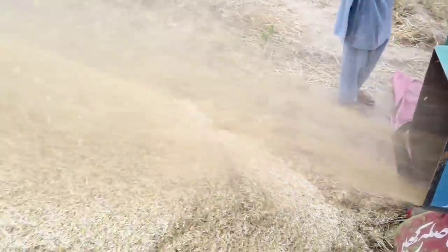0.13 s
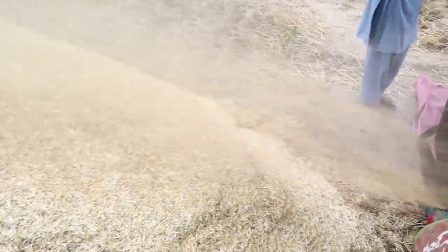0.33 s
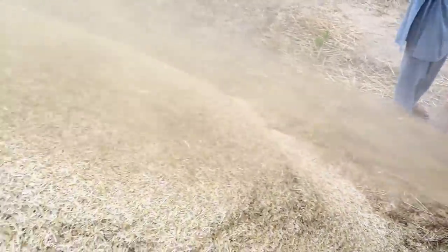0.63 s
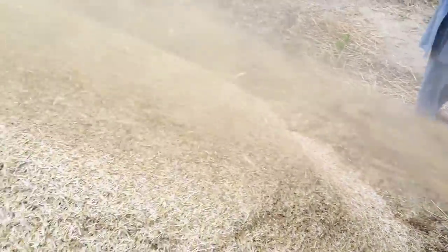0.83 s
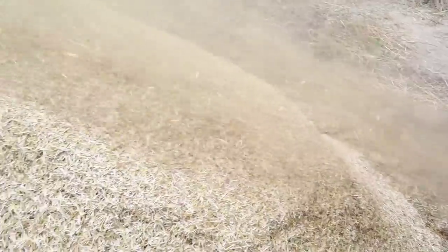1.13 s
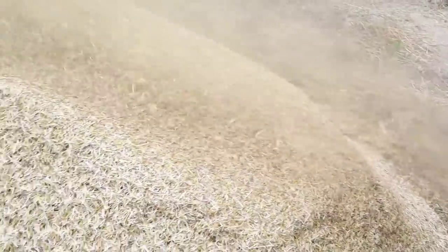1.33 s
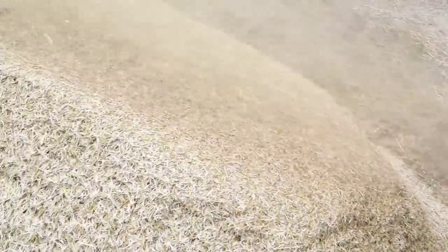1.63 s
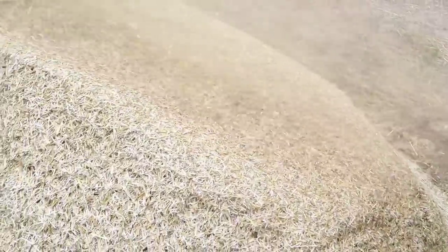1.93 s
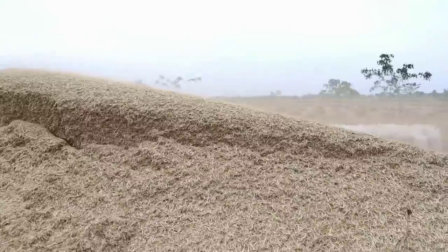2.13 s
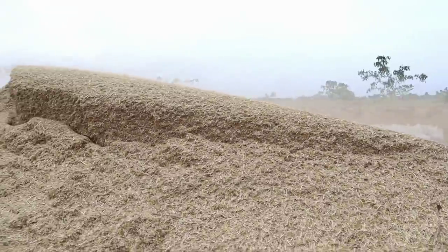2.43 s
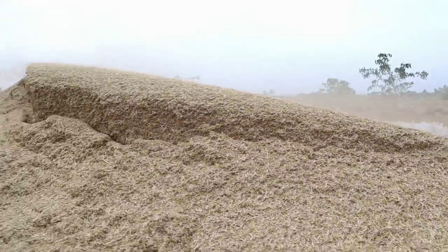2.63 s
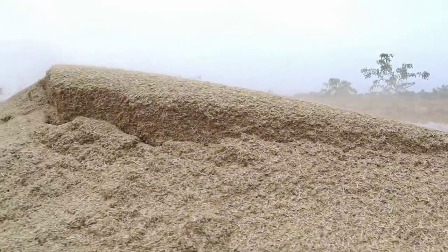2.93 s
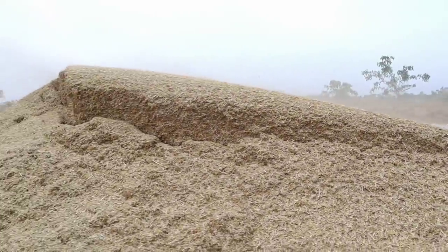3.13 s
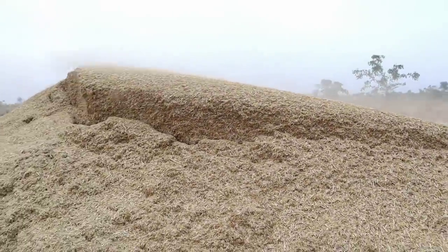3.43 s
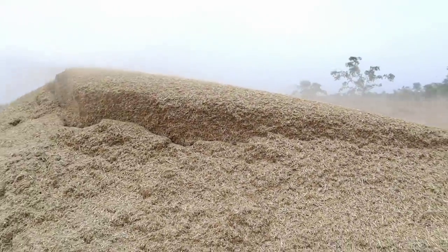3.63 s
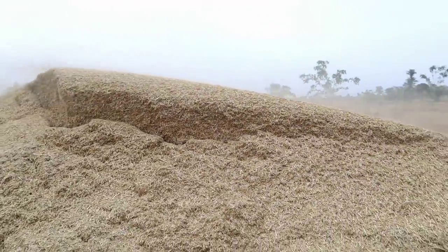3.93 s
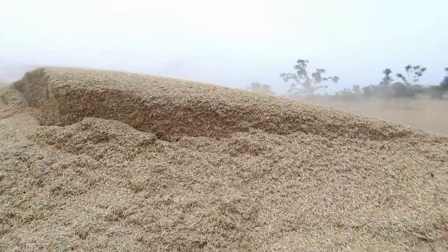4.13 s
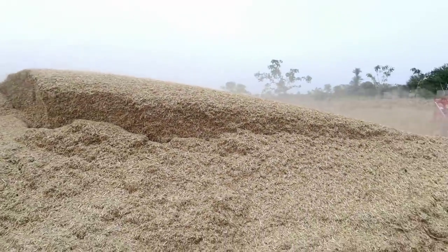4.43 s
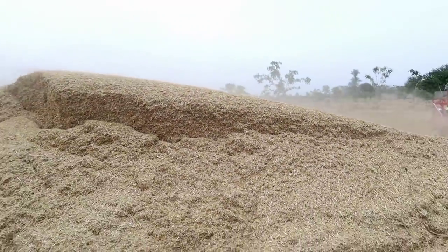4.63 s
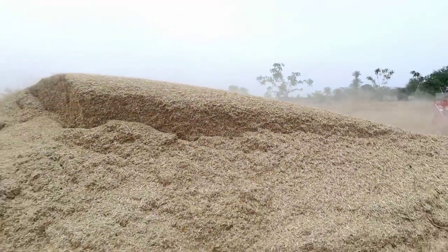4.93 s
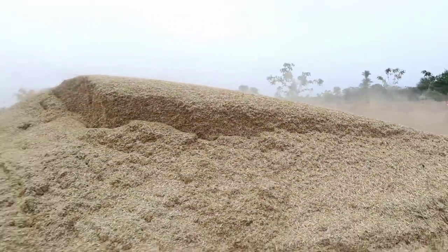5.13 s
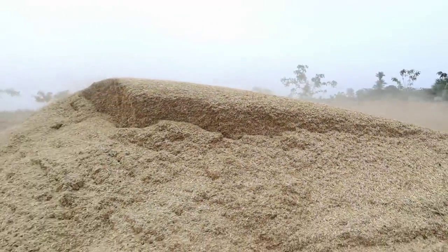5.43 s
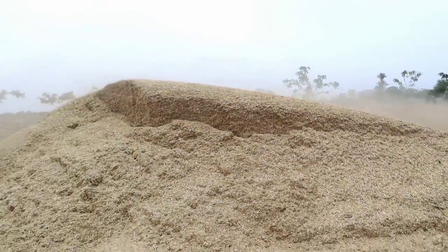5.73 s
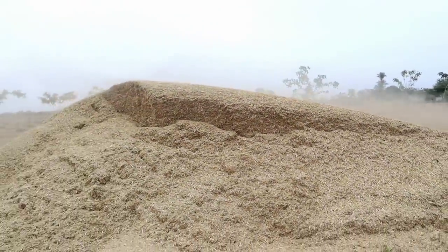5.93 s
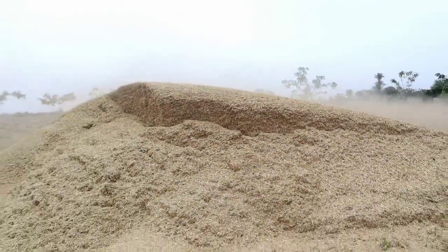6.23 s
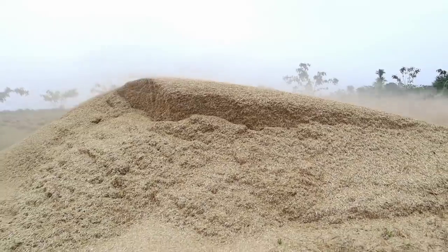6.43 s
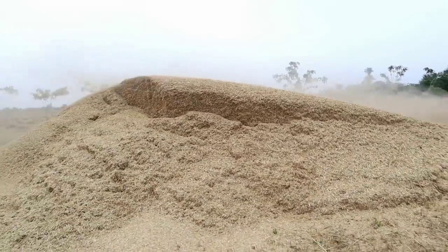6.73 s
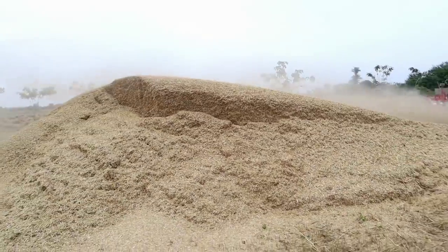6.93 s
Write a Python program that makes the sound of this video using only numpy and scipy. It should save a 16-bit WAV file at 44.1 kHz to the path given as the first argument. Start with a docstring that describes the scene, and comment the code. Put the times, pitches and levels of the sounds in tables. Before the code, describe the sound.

A diesel-driven thresher hums and roars steadily in a field, blowing hissing straw while stalks snap and patter on metal.

```python
"""A four-cylinder diesel drives a thresher in a field; its blower throws straw onto a heap.
The exhaust hums on its firing orders, the housing roars and throbs, and the straw jet hisses.
Stalks snap and patter on the sheet-metal casing and a loose part knocks, over a faint blower whine,
brief squeaks and booms. A handheld stereo microphone first stands beside the outlet, then the sound
crossfades to a place behind the heap, where the microphone slowly turns."""
import sys
import numpy as np
from scipy import signal
from scipy.fft import rfft, irfft, next_fast_len
from scipy.io import wavfile
from scipy.ndimage import uniform_filter1d, map_coordinates

SR = 44100
rng = np.random.default_rng(int(sys.argv[2]) if len(sys.argv) > 2 else 0)


def unload_audio(sound):
    """Save the sound as a 16-bit wav file, at the path given as the first command line argument."""
    columns = np.transpose(np.atleast_2d(sound))
    # keep every value between -1 and 1, then stretch to whole-number steps
    steps = np.round(np.clip(columns, -1, 1) * 32767)
    wavfile.write(sys.argv[1], SR, steps.astype(np.int16))


N = 311787
TIME = np.arange(N) / SR

# resonances of the loose part: pitch_hz, width_hz, gain_db
LOOSE_PART_MODES = [(1800, 350, -3.5), (2900, 500, -1.5), (3350, 300, -1), (3850, 300, 0), (4500, 700, -9)]


def amp(db):
    """Decibels to linear gain."""
    return 10 ** (np.asarray(db) / 20)


def unit(x):
    """Normalise to rms 1."""
    return x / np.sqrt(np.mean(x ** 2) + 1e-20)


def along(points, hz):
    """Read a curve of (freq_hz, value) points on a log frequency axis."""
    freqs, values = np.transpose(points)
    return np.interp(np.log(hz + 1), np.log(freqs + 1), values)


def curves(rows):
    """One automation curve for each column after the time."""
    times, *columns = np.transpose(rows)
    return [np.interp(TIME, times, column) for column in columns]


def wobble(rate):
    """Smooth random modulation, rate knots a second."""
    return map_coordinates(rng.standard_normal(int(N * rate / SR) + 4), [TIME * rate])


def filtered(x, response):
    """Filter x by a complex frequency response."""
    size = next_fast_len(N + SR // 4)
    return irfft(rfft(x, size) * response(np.fft.rfftfreq(size, 1 / SR)), size)[..., :N]


def patchy(depth_db):
    """Two white noises that share random patches of gain in time and frequency."""
    spectra = signal.stft(rng.standard_normal((2, N)), nperseg=512)[2]
    patches = uniform_filter1d(rng.standard_normal(spectra.shape[1:]), size=10, axis=0)
    patches = uniform_filter1d(patches, size=6, axis=1)
    return signal.istft(spectra * amp(depth_db * unit(patches)), nperseg=512)[1][:, :N]


def coloured(pair, eq):
    """A noise pair through an EQ curve, at rms 1."""
    return unit(filtered(pair, lambda hz: amp(along(eq, hz))))


def swell(start_s, length_s):
    """Half-sine envelope."""
    return np.sin(np.pi * np.clip((TIME - start_s) / length_s, 0, 1))


def scattered(count, softest_db, range_db):
    """Random hits: start_s, level_db."""
    when, strength = rng.random((count, 2)).T
    return np.c_[when * (N - 1) / SR, softest_db + range_db * strength]


def impacts(hits, modes, t60_s, boost_db, attack_s):
    """Each hit is a short noise burst that rings a set of resonances."""
    t = np.arange(SR // 10) / SR
    envelope = amp(boost_db - 60 * t / t60_s) * (1 - np.exp(-t / attack_s))
    force = np.zeros((2, N + len(t)))
    for start_s, db in hits:
        start = round(start_s * SR)
        force[:, start:start + len(t)] += amp(db) * envelope * np.sign(rng.standard_normal((2, len(t))))

    def body(hz):
        return sum((-1) ** k * amp(db) * 1j * hz * width / (pitch ** 2 - hz ** 2 + 1j * hz * width)
                   for k, (pitch, width, db) in enumerate(modes))
    return filtered(force[:, :N], body)


def perspective(near, far, turned):
    """Crossfade from beside the outlet (near) to behind the heap (far), then swing round (turned)."""
    fade_s, turn_s = (2.1, 2.324), (3.7, 4.35)
    away = np.interp(TIME, fade_s, [0, 1])
    swung = np.interp(TIME, turn_s, [0, 1])
    return (1 - away) * near + away * ((1 - swung) * far + swung * turned)


def left_channel(pair):
    """The left port is shaded, out of phase and partly unrelated to the right, which hears pair[0]."""
    # left level against right: freq_hz, gain_db
    shade = [(50, 0), (90, -.2), (170, -1.3), (300, -3.6), (450, -5.6), (650, -6.8), (900, -5.6),
             (1250, -6), (1800, -9), (2400, -7.5), (3300, -4.2), (4500, -6), (5500, -3), (8000, -1.3),
             (12000, -.2)]
    # left phase against right: freq_hz, phase_rad
    phase = [(150, 0), (450, -.2), (650, -.45), (900, -1.15), (1250, -1.9), (1700, -2.25), (2400, -2.15),
             (3300, -2.7), (5500, -2.75), (8000, -3.05), (12500, -3.4)]
    # likeness of the ports in each perspective: freq_hz, coherence (0-1)
    near_coherence = [(150, 1), (450, .98), (900, .9), (1700, .75), (3300, .73), (5500, .6), (8000, .76),
                      (11000, .66), (13000, .5)]
    far_coherence = [(150, 1), (450, .97), (900, .94), (2400, .83), (4500, .75), (5800, .98), (8300, .99),
                     (9500, .6), (11000, 0)]
    turned_coherence = [(150, 1), (450, .97), (900, .91), (3300, .82), (5500, .65), (8000, .84),
                        (11000, .93), (12500, .5)]

    def port(coherence):
        def response(hz):
            alike = np.clip(along(coherence, hz), 0, 1)
            shadow = amp(along(shade, hz)) * np.exp(1j * along(phase, hz))
            return shadow * [alike, np.sqrt(1 - alike ** 2)]
        return filtered(pair, response).sum(axis=0)
    return perspective(port(near_coherence), port(far_coherence), port(turned_coherence))


def blower_whine():
    """Faint wavering tones of the blower, heard only behind the heap."""
    # tones once the microphone has turned: pitch_hz, level_db
    partials = [(553, -54.5), (742, -51), (1070, -61)]
    tones = np.zeros(N)
    for hz, db in partials:
        gain = np.sqrt(2) * amp(db + 1.7 * wobble(4.3))
        tones += gain * np.sin(2 * np.pi * hz * TIME + .9 * wobble(4))
    return perspective(0, amp(-4.5) * tones, tones)


def squeaks():
    """Brief high squeaks that flutter in level and pitch."""
    # squeak cues: start_s, length_s, pitch_hz, level_db
    cues = [(1.045, .03, 3950, -42), (1.32, .08, 3950, -44), (5.61, .03, 3150, -42)]
    out = np.zeros(N)
    for start_s, length_s, hz, db in cues:
        envelope = amp(db + 4.6 * wobble(87.7)) * swell(start_s, length_s) ** .5
        out += envelope * np.sin(2 * np.pi * hz * TIME + 0.77 * wobble(200))
    return out


def casing_booms():
    """The casing booms briefly: narrow noise swells in one resonance at a time."""
    # boom cues: start_s, length_s, pitch_hz, level_db
    cues = [(4.9, 0.57, 565, -43.5), (5.499, 0.282, 731, -40.5)]
    width_hz = 28
    out = np.zeros(N)
    for start_s, length_s, pitch_hz, db in cues:
        ring = filtered(rng.standard_normal(N), lambda hz: np.exp(-((hz - pitch_hz) / width_hz) ** 2))
        out += amp(db) * swell(start_s, length_s) * unit(ring)
    return out


def loose_part_rattle():
    """The loose part chatters in many small random hits."""
    hits = scattered(150, softest_db=-44, range_db=8)
    return impacts(hits, LOOSE_PART_MODES, t60_s=.032, boost_db=12.5, attack_s=.001)


def loose_part_knocks():
    """Harder hits of the loose part, each with a short bright ring."""
    # knock cues: start_s, strength_db
    hits = [(0.269, -27.5), (0.39, -30), (1.11, -31.3), (1.627, -32.7), (1.988, -33.5), (2.145, -33),
            (2.945, -32.5), (3.102, -34), (3.424, -34), (3.9, -35), (4.155, -33), (4.166, -30.5),
            (4.18, -32), (4.253, -33.5), (4.317, -33), (4.442, -33), (4.755, -32), (4.829, -32),
            (4.85, -33), (5.048, -27.5), (5.06, -30), (5.16, -34), (5.208, -32.5), (5.358, -33.7),
            (5.423, -33.5), (5.505, -33), (5.618, -30), (5.849, -27), (5.955, -29.5), (6.009, -32),
            (6.049, -31.5), (6.154, -29.5), (6.193, -33), (6.259, -28), (6.367, -30.5), (6.4, -33),
            (6.445, -32), (6.514, -29.5), (6.62, -33.5), (6.662, -33), (6.768, -30.5), (6.861, -32),
            (6.952, -32), (7.0, -32), (7.02, -33)]
    return impacts(hits, LOOSE_PART_MODES, t60_s=.038, boost_db=14.2, attack_s=.001)


def casing_patter():
    """Grain and stalks patter on the casing, clearest once the microphone has swung round."""
    # sheet-metal resonances: pitch_hz, width_hz, gain_db
    modes = [(555, 54, -1.5), (740, 39, 1), (803, 44, -3.5), (1081, 54, 0), (1683, 140, 0.5),
             (1897, 220, -4), (2970, 320, -14), (3970, 280, -22)]
    # the hardest taps: start_s, strength_db
    hard_hits = [(4.2066, -41), (4.253, -37), (4.3198, -37), (4.4505, -33), (4.6541, -31), (4.7189, -28),
                 (4.7858, -33), (4.92, -34), (5.0332, -33), (5.3235, -36), (5.3704, -34), (5.4368, -36),
                 (5.5076, -37), (5.577, -35), (5.6902, -36), (6.0329, -32), (6.0798, -29), (6.2609, -38),
                 (6.3547, -35), (6.5852, -32), (6.678, -30), (6.7234, -34), (6.7922, -33), (6.9074, -34),
                 (6.9738, -28.5), (7.0232, -40)]
    light_hits = scattered(700, softest_db=-33, range_db=6)
    patter = impacts(light_hits, modes, t60_s=.02, boost_db=16, attack_s=.0007)
    clacks = impacts(hard_hits, modes, t60_s=.019, boost_db=23, attack_s=.0007)
    return patter * perspective(amp(-8.5), amp(-5.5), amp(-2.5)) + clacks


def stalk_snaps():
    """Stalks strike close by with a crisp snap."""
    # snap cues: start_s, strength_db
    hits = [(0.105, -30), (0.323, -35), (0.487, -25), (0.606, -28), (0.892, -26), (1.034, -20.5),
            (1.223, -28), (1.318, -28), (1.365, -21.5), (1.412, -24.5), (1.436, -32), (4.184, -27),
            (4.451, -29), (4.888, -33)]
    # stalk resonances: pitch_hz, width_hz, gain_db
    modes = [(4500, 2000, -8), (7000, 1500, -4), (9200, 1200, 0), (11500, 2000, -3)]
    return impacts(hits, modes, t60_s=.11, boost_db=0, attack_s=.0024)


def straw_hiss(level_db, shake):
    """The straw jet hisses unevenly and pulses lightly with the engine."""
    # hiss EQ in each perspective: freq_hz, gain_db
    near_eq = [(3000, -14), (5000, -.5), (7000, -1), (9500, 0), (11000, 0), (12500, -4), (14000, -11),
               (15400, -24)]
    far_eq = [(3000, -14), (4300, 2), (5500, 2.5), (6500, -2), (8000, -3), (11000, -4), (12500, -5),
              (14000, -9), (15400, -20)]
    turned_eq = [(3000, -16), (4700, 0), (7000, -3), (8000, 0), (9800, 0), (11000, -4), (12500, -8),
                 (14000, -14), (15400, -29)]
    chaff = patchy(depth_db=1.1) * np.sqrt(shake)
    chaff *= amp(wobble(5) + 1.1 * wobble(14) + 1.5 * wobble(300))  # clumps and single grains
    return amp(level_db) * perspective(*[coloured(chaff, eq) for eq in (near_eq, far_eq, turned_eq)])


def housing_roar(level_db, shake):
    """Housing and blower roar: broad noise that throbs with the engine."""
    # roar EQ in each perspective: freq_hz, gain_db
    near_eq = [(45, -8), (65, -4), (85, -8), (110, -6.5), (165, -1.5), (205, 4), (270, -2), (350, 0),
               (430, -3), (560, -3.5), (720, -2), (1100, -6.5), (1500, -10.5), (2500, -13.5), (3900, -17.5),
               (4600, -20), (6500, -53)]
    far_eq = [(45, -13), (70, -5), (120, -5.5), (155, -5), (195, 0), (240, -6), (330, -5), (400, -1),
              (480, -1), (680, -3), (800, -2.5), (950, -6.5), (1100, -3), (1500, -10.5), (2200, -9),
              (2700, -16), (4000, -16.5), (6500, -42)]
    turned_eq = [(45, -3.5), (70, -7), (150, -2), (200, -2), (300, -6.5), (400, -8.5), (560, -1.5),
                 (670, 0), (740, -3), (810, 0), (870, -7), (1100, -6.5), (1210, -7.5), (1700, -8.5),
                 (2300, -11.5), (3200, -17), (3900, -14), (6500, -48)]
    air = patchy(depth_db=0.8) * shake
    return amp(level_db) * perspective(*[coloured(air, eq) for eq in (near_eq, far_eq, turned_eq)])


def throb(angle, depth_db):
    """Each firing shakes the housing; one cylinder in four shakes it more."""
    return amp(depth_db * (np.cos(angle) + 0.31 * np.cos(2 * angle) + 0.17 * np.cos(angle / 4)))


def exhaust(firing_hz, automated, strong, weak, sway_db, flutter_db, slip_rad, lope_db):
    """Sines at multiples (orders) of the firing rate, loping once in four firings: hum, firing angle."""
    angle = 2 * np.pi * np.cumsum(firing_hz) / SR
    swaying = [(order, db + sway_db * wobble(2.7)) for order, db in strong]
    hum = np.zeros(N)
    for order, db in automated + swaying:
        # the pipe spreads each pulse: higher orders slip in phase, and all drift a little
        hum += amp(db) * np.cos(order * angle + slip_rad * (order - 1) ** 2 + .2 * wobble(.7))
    for order, db in weak:  # fractional orders come from unequal cylinders
        hum += amp(db + flutter_db * wobble(3.7)) * np.sin(order * angle + 2 * np.pi * rng.random())
    return np.sqrt(2) * hum * amp(lope_db * np.cos(angle / 4)), angle


def diesel_near():
    """Beside the outlet the diesel lopes and creeps up in speed."""
    # engine automation: time_s, firing_hz, order1_db, order2_db, order4_db
    automation = [(0.0, 41.9, -40, -34, -33.5), (0.3, 41.87, -40, -40, -35.5), (0.55, 41.78, -45, -41, -38),
                  (0.68, 42.05, -45, -42, -38), (0.8, 42.25, -42, -39, -34.5),
                  (1.1, 42.44, -44, -34.5, -35), (1.35, 42.55, -43, -33, -34), (1.55, 42.5, -41, -33, -40),
                  (1.75, 42.68, -39, -32.5, -38.5), (1.92, 42.8, -40, -31.5, -34),
                  (2.3, 43.3, -40, -36.5, -36.5)]
    # further exhaust partials, strong and weak: order, level_db
    strong = [(3, -41.5), (5, -45.5), (6, -46.5), (7, -43), (10, -45.5)]
    weak = [(1.5, -49.5), (4.25, -59), (7.75, -56), (8.0, -48), (8.25, -56), (9.0, -49.5), (11.0, -50.5),
            (12.0, -58)]
    firing_hz, first_db, second_db, fourth_db = curves(automation)
    automated = [(1, first_db), (2, second_db), (4, fourth_db)]
    return exhaust(firing_hz, automated, strong, weak, sway_db=-.5, flutter_db=0, slip_rad=.6, lope_db=1.4)


def diesel_far():
    """Behind the heap the diesel sags in speed; as it slows, order 5 grows and order 10 fades."""
    # engine automation: time_s, firing_hz, order1_db, order2_db, order4_db
    automation = [(2.2, 45.75, -37, -37.5, -43.5), (2.6, 45.9, -36.5, -33.5, -44.5),
                  (3.1, 45.87, -37.5, -32.5, -42.5), (3.55, 46.38, -38, -32, -40.5),
                  (3.8, 45.97, -39, -32.5, -40.5), (4.03, 45.6, -36, -32, -39.5),
                  (4.25, 45.43, -42, -34.5, -41.5), (4.5, 44.97, -43, -38, -44.5),
                  (5.04, 44.44, -46, -45.5, -40.5), (5.3, 44.06, -49, -38.5, -40),
                  (5.75, 43.36, -48, -33, -42.5), (6.2, 43.44, -45, -32.2, -40.5),
                  (6.6, 43.44, -43, -32.5, -40.5), (7.07, 44.1, -38, -34.5, -43)]
    # further exhaust partials, strong and weak: order, level_db
    strong = [(1.5, -50.5), (6, -49.5), (12, -53.5)]
    weak = [(1.75, -56), (2.25, -60), (4.25, -54), (7.0, -60), (7.75, -54.5), (9.0, -58.5), (11.0, -53),
            (13.0, -53.5)]
    firing_hz, first_db, second_db, fourth_db = curves(automation)
    sag_hz = 46.32 - firing_hz  # below full speed
    automated = [(1, first_db), (2, second_db), (4, fourth_db),
                 (3, second_db - 14.5), (5, -68.5 + 5 * sag_hz), (10, -45 - 4 * sag_hz)]
    return exhaust(firing_hz, automated, strong, weak,
                   sway_db=.6, flutter_db=2.5, slip_rad=.4, lope_db=.46)


def thresher():
    """The diesel's hum, with the roar and straw hiss that its firings shake."""
    # noise level automation: time_s, roar_db, hiss_db
    levels = [(0.05, -31, -40), (0.75, -32, -41), (1.25, -31.5, -40), (1.84, -32.5, -41.5),
              (2.2, -35.5, -46), (2.44, -33, -47.5), (3.0, -34.5, -47), (3.6, -34.5, -47.5),
              (3.85, -34, -44), (4.15, -33, -44), (4.45, -34.5, -41.5), (5.4, -33.5, -44.5),
              (5.85, -33.5, -43.5), (6.3, -35, -45), (6.65, -34, -44.5), (7.02, -34, -43)]
    roar_db, hiss_db = curves(levels)
    near_hum, near_angle = diesel_near()
    far_hum, far_angle = diesel_far()
    hum = perspective(near_hum, far_hum, far_hum)
    far_shake = throb(far_angle, depth_db=0.93)
    shake = perspective(throb(near_angle, depth_db=0.5), far_shake, far_shake)
    return hum + housing_roar(roar_db, shake) + straw_hiss(hiss_db, shake)


def scene():
    """The stereo mix; the microphone's right port faces the machine."""
    pair = loose_part_knocks() + stalk_snaps() + thresher() + loose_part_rattle() + casing_patter()
    pair += squeaks() + blower_whine() + casing_booms()
    return np.array([left_channel(pair), pair[0]])


def record(dry):
    """A steep low cut and a brick-wall high cut."""
    low_cut_hz, high_cut_hz = 38, 15400
    return filtered(dry, lambda hz: (hz < high_cut_hz) / np.sqrt(1 + (low_cut_hz / (hz + 1)) ** 16))


dry = scene()
out = record(dry)
unload_audio(out)
```